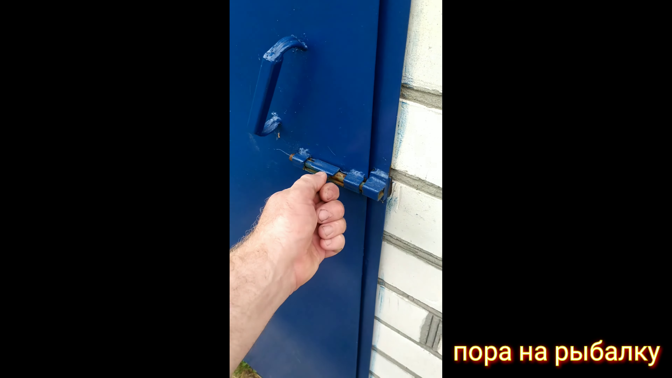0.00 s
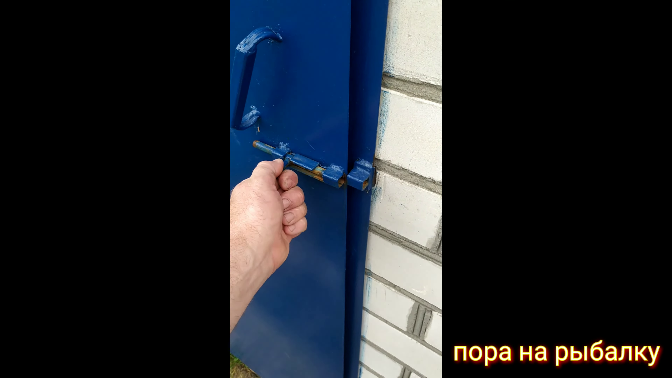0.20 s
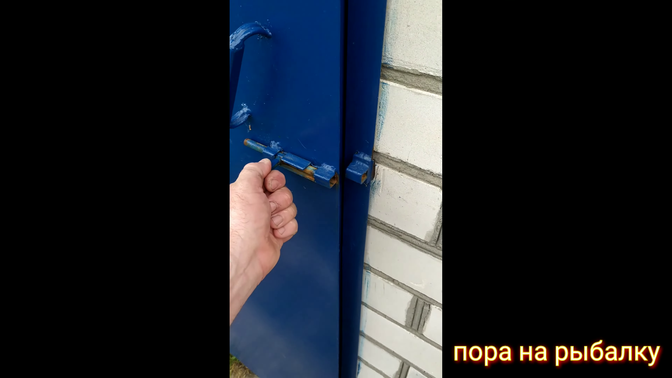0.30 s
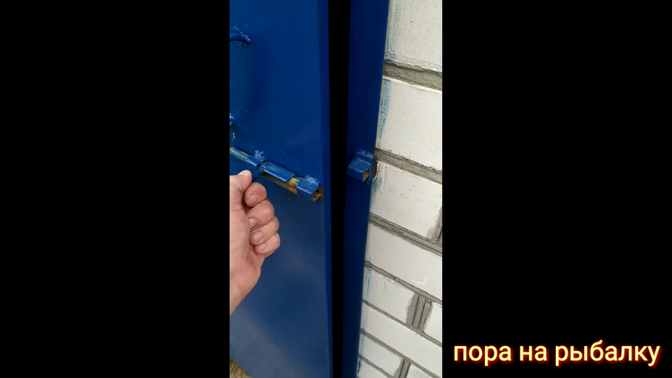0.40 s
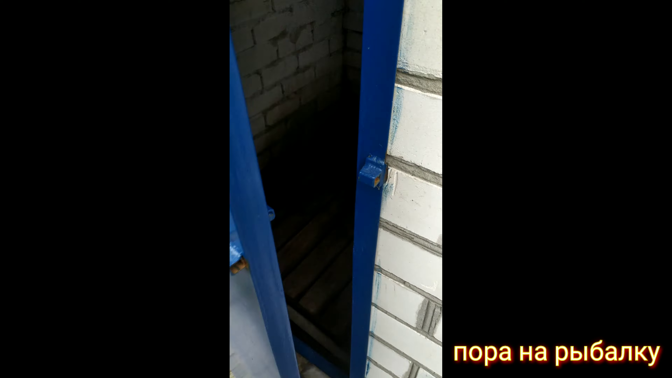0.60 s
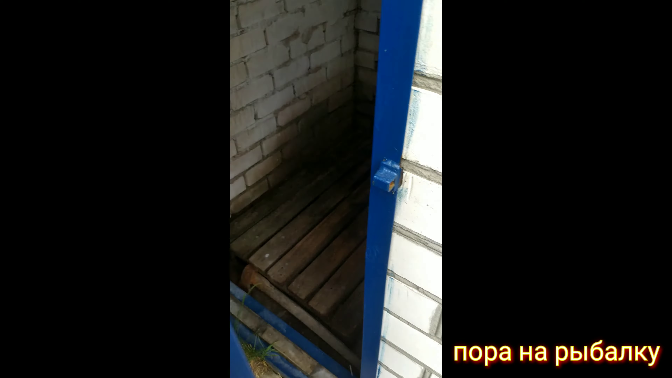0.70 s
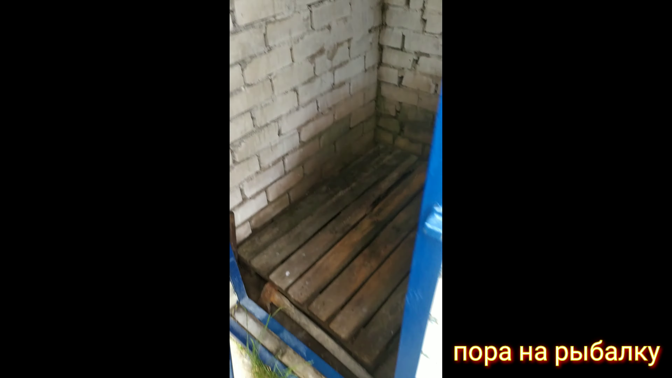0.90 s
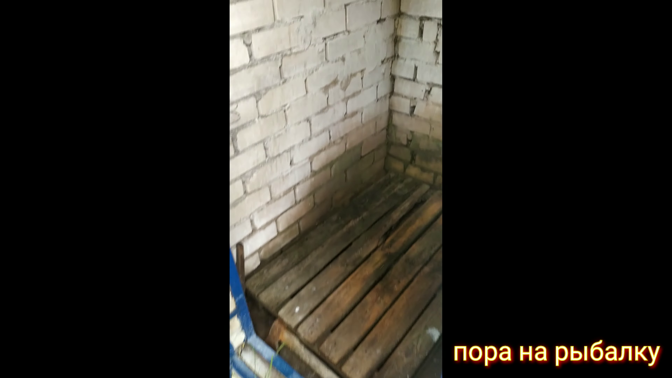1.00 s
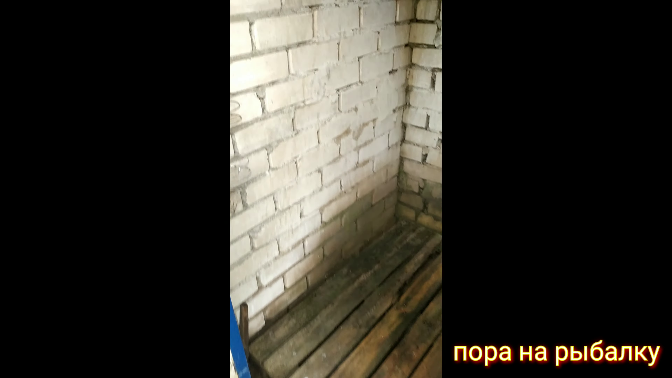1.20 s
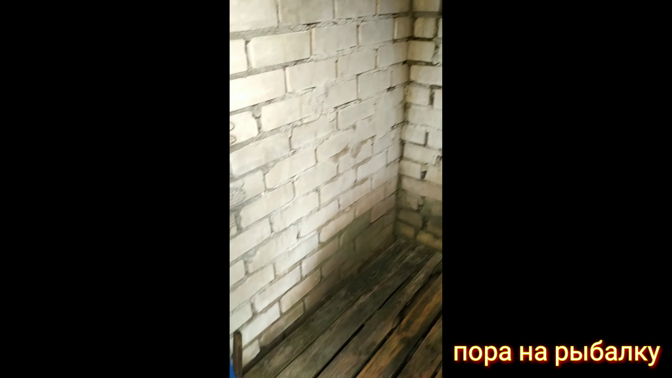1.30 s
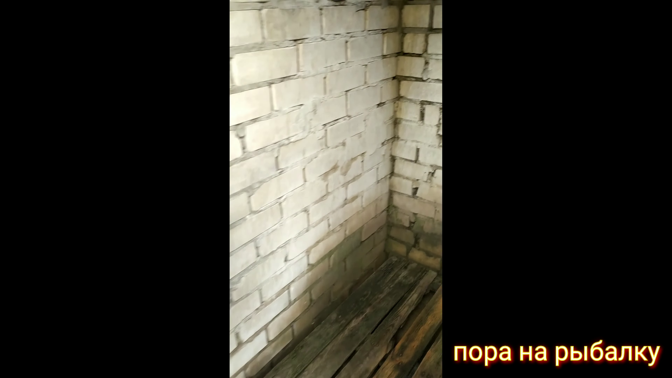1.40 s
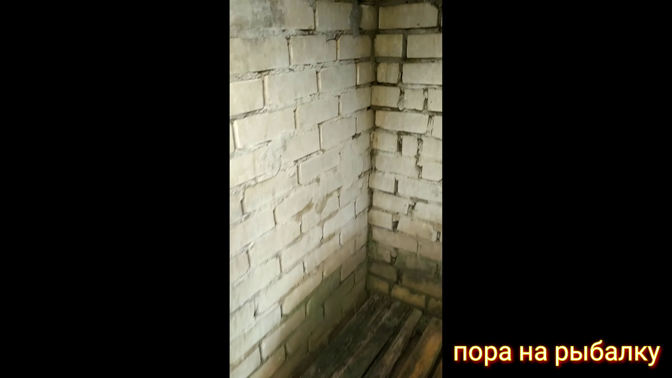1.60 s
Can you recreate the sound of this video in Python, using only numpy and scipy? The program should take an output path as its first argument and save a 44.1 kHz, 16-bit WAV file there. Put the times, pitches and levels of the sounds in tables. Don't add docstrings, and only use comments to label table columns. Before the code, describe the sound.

Metal bolt snaps back hard on a sheet-steel door, followed by lighter clinks and faint hiss

```python
import sys
import numpy as np
from scipy import signal
from scipy.fft import rfft, irfft
from scipy.io import wavfile
from scipy.ndimage import uniform_filter1d

SR = 44100
rng = np.random.default_rng(int(sys.argv[2]) if len(sys.argv) > 2 else 0)


def amp(db):
    return 10 ** (np.asarray(db, float) / 20)


def write(x):
    x = np.atleast_2d(x).T
    wavfile.write(sys.argv[1], SR, np.round(np.clip(x, -1, 1) * 32767).astype(np.int16))


N = 74970

# start in seconds, level in dB, chatter length in seconds,
# tilt in dB per octave, left-right difference in dB.
BOLT_HITS = [
    (.107, -39, 0.0092, -3.5, 1.5),
    (.2048, -19.5, 0.002, 0.5, .4),
    (.2066, -11, 0.0026, 1.5, 0.5),
    (.2125, -11.5, 0.013, 0.77, 2.7),
    (.226, -20, 0.04, -1.5, 1),
    (.252, -35, 0.04, 3, 4),
    (.3288, -22.5, 0.0031, 2, 3),
    (.3342, -24, 0.0043, 0.5, 1.5),
    (.487, -54, 0.0041, 3, 2),
]
# frequency in Hz, density in dB per Hz.
BOLT_COLOUR = [(120, -22), (200, -14.5), (386, -8.5), (829, -9.5), (2090, -5.5), (4410, -9), (8070, -1.5),
               (13000, -20), (14000, -15.5)]
# frequency in Hz, 60 dB decay time in seconds.
BOLT_T60 = [(250, 0.78), (1000, 0.2), (3000, 0.17), (8000, 0.068), (13000, 0.068)]
# frequency in Hz, level in dB, 60 dB decay time in seconds.
BOLT_MODES = [(7910, -15, 0.16), (7970, 5, 0.071), (8200, -29, 0.16), (8650, 2, 0.082), (9000, 3, 0.031)]


def bolt():
    return steel(BOLT_HITS, BOLT_COLOUR, BOLT_T60, BOLT_MODES, ring_db=6)


# start in seconds, level in dB, length in seconds,
# tilt in dB per octave, left-right difference in dB.
SCRAPES = [
    (.114, -31, 0.023, -4, 2),
    (.186, -27.5, 0.027, -1.5, 1.5),
    (1.092, -37.5, 0.058, -4.5, 2),
    (.11, -40, 0.041, 0.5, -1),
]
# frequency in Hz, 60 dB decay time in seconds.
SCRAPE_T60 = [(300, 0.92), (2000, 0.031), (10000, 0.11)]


def scrapes():
    return steel(SCRAPES, BOLT_COLOUR, SCRAPE_T60, count=400, swell=True)


# start in seconds, level in dB, chatter length in seconds,
# tilt in dB per octave, left-right difference in dB.
LOOSE_HITS = [(0, -48.5, 0.00064, -9, -1), (.6722, -51, 0.01, -4.5, 2.5), (.878, -57.5, 0.051, 10, 9),
              (.9188, -30.5, 0.0068, 1.5, 2.5), (.985, -39, 0.026, -5, -2.5), (1.0016, -27, 0.012, 8, 1),
              (1.0212, -30, 0.0026, 9, -5), (1.0245, -25.5, 0.0053, 0.3, -2),
              (1.0272, -26, 0.0058, -0.4, 3), (1.266, -47, 0.031, 2.5, 5.5), (1.096, -33.5, 0.043, -4, 1.6),
              (1.2, -53, 0.01, 1, 1), (1.697, -46.5, 0.0036, -9.5, 5)]
# frequency in Hz, density in dB per Hz.
LOOSE_COLOUR = [(350, -21), (600, -12), (1640, -1.5), (2850, -4), (4080, 1), (10500, -15), (13600, -97),
                (22000, -120)]
# frequency in Hz, 60 dB decay time in seconds.
LOOSE_T60 = [(500, 0.45), (2000, 0.27), (6000, 0.14), (12000, 0.206)]


def loose_parts():
    return steel(LOOSE_HITS, LOOSE_COLOUR, LOOSE_T60)


# start in seconds, level in dB, chatter length in seconds,
# tilt in dB per octave, left-right difference in dB.
DRY_HITS = [
    (1.2641, -32, 0.0007, 1.5, 7),
    (1.0212, -29, .0008, 11, 10),
    (1.0016, -30, .0008, 5, 8),
]
# frequency in Hz, density in dB per Hz.
DRY_COLOUR = [(200, 2), (900, -21), (1800, -7.5), (5000, 1), (10000, -29)]
# frequency in Hz, 60 dB decay time in seconds.
DRY_T60 = [(200, 0.1), (2000, 0.057), (10000, 0.025)]


def dry_taps():
    return steel(DRY_HITS, DRY_COLOUR, DRY_T60, count=400)


# start in seconds, frequency in Hz, rise in seconds, 60 dB decay time in seconds.
PINGS = [(1.121, 11800, .03, .085), (1.002, 12200, .003, .3), (.9195, 1930, .002, .07),
         (1.022, 1630, .003, .2), (1.285, 1385, .012, .1), (.12, 710, .006, .11), (1.676, 105, .008, .07),
         (.2, 135, .03, .4), (.21, 390, .02, .4), (.3, 375, .015, .22), (1.572, 65, .01, .15),
         (1.04, 330, .02, .3), (1.155, 7300, .005, .15), (1.264, 210, .002, .07), (.13, 200, .02, .25),
         (1.09, 975, .015, .3), (.6715, 2000, .001, .17), (.672, 4000, .001, .12), (.676, 2900, .005, .15),
         (.68, 2500, .006, .15), (.206, 9250, .002, .06), (.2122, 7150, .002, .07), (.214, 8050, .004, .13),
         (.19, 7000, .008, .05), (.3288, 9150, .004, .035), (.334, 7000, .001, .05),
         (.331, 2010, .004, .25), (.34, 5050, .006, .1), (1.0025, 8050, .006, .05),
         (1.002, 4200, .003, .08), (1.025, 4250, .002, .1), (1.025, 6200, .002, .06),
         (.985, 2000, .005, .06), (1.097, 1610, .01, .25), (1.1, 1250, .02, .2), (.92, 6900, .002, .1),
         (1.2645, 330, .001, .05), (1.2642, 2000, .001, .04), (1.266, 4900, .003, .12),
         (.205, 560, .008, .2), (1.02, 200, .008, .15), (1.095, 170, .01, .12), (.19, 215, .01, .2),
         (.11, 2050, .015, .3), (.92, 4200, .002, .12), (1.208, 2550, .006, .12)]
PING_DB = [-13, -39, -31, -36, -44.5, -36, -38.5, -37.5, -38, -41, -49, -58.5, -51, -48, -41.5, -44.5, -47,
           -60, -58.5, -55, -15, -15.5, -21, -40.5, -13.5, -23.5, -42, -36, -23.5, -26, -34, -26, -40, -52,
           -49, -30, -51.5, -42, -46, -41, -52.5, -49.5, -43.5, -39.5, -41.5, -44]
PING_PAN_DB = [-4.5, -1, -3, .3, 12, 0.7, -16, -1.5, 1, 2, -17.5, 6, 12, 0, -0.7, -8, 1, -1, 5.5, 5.5, 1.5,
               1.5, -2, -1.5, -5, 5.5, 7.5, 9, 19.5, 9, 12, 9, -9, -4, -3, 4.5, 5, -7.5, 4, .3, -2, -2, .4,
               -1.5, 3, 0]


def pings():
    out, t = np.zeros((2, N)), np.arange(SR // 3) / SR
    for (s, hz, rise, t60), db, pan_db in zip(PINGS, PING_DB, PING_PAN_DB):
        u = rng.random((3, 7, 1, 1))
        spread = .06 if 600 < hz < 7000 else .022
        lag = min(hz / 2000, 1) * np.array([[2.8], [0]]) * u[0] ** (2000 / max(hz, 4000))
        phase = lag + min(hz / 300, 6) * u[2]
        knot = .75 * np.sin(2 * np.pi * hz * (1 + spread * (2 * u[1] - 1)) * t + phase).sum(0)
        envelope = (1 - np.exp(-t / rise)) * decay(t, t60)
        add(out, panned(db, pan_db) * envelope * knot, s)
    return out


def steel(hits, colour, t60, named=(), ring_db=0., count=600, swell=False):
    place = (np.arange(count) + rng.random(count)) / count
    hz = colour[0][0] + (colour[-1][0] - colour[0][0]) * place ** 2
    life = logcurve(t60, hz) * amp(1.1 * rng.standard_normal(count))
    db = logcurve(colour, hz) + 5 * np.log10(hz / 1000) - 10 * np.log10(life)
    if len(named):
        named_hz, named_db, named_t60 = np.array(named).T
        hz = np.r_[hz, named_hz]
        db = np.r_[db, db.max() + ring_db + np.minimum(named_db, 0) / 2]
        life = np.r_[life, np.minimum(named_t60, .11)]
    rings = rings_of(2j * np.pi * hz - np.log(1000) / life)
    t, out = np.arange(rings.shape[1]) / SR, np.zeros((2, N))

    z = rng.standard_normal((len(hits), 4, len(hz)))
    tilted = amp(db + np.array(hits)[:, 3:4] * np.log2(hz / 3000))
    gains = pair(hz, z[:, 0] + 1j * z[:, 1], z[:, 2] + 1j * z[:, 3]) * tilted
    gains = gains.reshape(-1, len(hz)).astype(np.complex64)
    crack = 1 + amp(3) * np.exp(-t / .001)
    struck = (gains @ rings).imag.reshape(2, len(hits), -1) * crack

    for (s, level_db, length, _, pan_db), ring in zip(hits, struck.swapaxes(0, 1)):
        x = signal.fftconvolve(ring, chatter(length, swell)[None], axes=1)
        x = x / np.sqrt(uniform_filter1d(x.mean(0) ** 2, 220).max())
        add(out, x * panned(level_db, pan_db), max(s, 0))
    return out


def chatter(length, swell):
    clicks_per_s, spread_db = 2000, 3
    u = rng.random((3, 4096))
    at = np.arange(4096) / SR / max(length, .001)
    if swell:
        envelope = np.sin(np.pi * np.minimum(at, 1))
    else:
        envelope = np.sqrt(np.maximum(1 - at, 0))
    sizes = amp(-spread_db * np.log(u[2] + 1e-3))
    clicks = (u[0] < clicks_per_s / SR) * np.sign(u[1] - .5) * sizes * envelope
    clicks[0] = 0 if swell else 1.44
    return clicks


def rings_of(pole, size=128):
    step = np.arange(size) / SR
    fine, coarse = (np.exp(np.outer(pole, step * k)).astype(np.complex64) for k in (1, size))
    return (coarse[:, :, None] * fine[:, None, :]).reshape(len(pole), -1)


# time in seconds, level in dB.
BOOM_DB = [(0, -37), (.08, -45.5), (.22, -41), (.55, -48), (.62, -57), (1.7, -58.5)]
# frequency in Hz, density in dB per Hz.
RUMBLE = [(100, 7), (170, 1), (366, -0.5), (501, -7), (900, -39), (1170, -80), (1980, -120)]
# time in seconds, level in dB.
RUMBLE_DB = [(0.0, -46), (1.002, -62), (1.7, -60.5)]


def door(t):
    boom_hz, width_hz = 128.3, 34
    b, a = signal.iirpeak(boom_hz, boom_hz / width_hz, fs=SR)
    boom = signal.lfilter(b, a, signal.lfilter(b, a, white()))
    boom = unit(boom) * amp(curve(BOOM_DB, t))
    return boom + coloured(RUMBLE, 4.5, 7.9, white) * amp(curve(RUMBLE_DB, t))


# frequency in Hz, density in dB per Hz.
HISS = [(2060, -6.5), (3500, -10), (4590, -8), (7900, -3.5), (9170, -2.5), (15300, -10)]
# time in seconds, level in dB.
HISS_DB = [(0, -63), (.5, -62.5), (.8, -61.5), (.9, -54.5), (1.2, -54), (1.33, -51.5), (1.42, -58),
           (1.5, -53), (1.7, -53)]


def water(t):
    return coloured(HISS, 3.2, 13.27, drops) * amp(curve(HISS_DB, t))


def drops():
    drops_per_s, spread_db = 7100, 1.5
    falls = rng.random(N) < drops_per_s / SR
    return white() * (0.19 + falls * amp(spread_db * rng.exponential(size=N)))


# frequency in Hz, density in dB per Hz.
HANDLING = [(12, -55), (20, -49), (54, 2.5), (92, -5), (200, -26), (260, -8.5), (440, -120)]
# time in seconds, level in dB.
HANDLING_DB = [(0, -47.5), (.42, -51.5), (.52, -56), (.78, -52.5), (.92, -55), (1.1, -51.5), (1.19, -50),
               (1.28, -52), (1.5, -57), (1.58, -55), (1.7, -63)]


def handling(t):
    common = coloured(HANDLING, 2.1, 28.0, white)
    difference = coloured(HANDLING, 2.1, 28.0, white)
    both = common + .55 * np.array([[-1], [1]]) * difference
    return both * panned(curve(HANDLING_DB, t), -0.5)


# frequency in Hz, density in dB per Hz.
YARD = [(240, 2.5), (400, -13.5), (433, -4.5), (575, -9), (689, -5), (6000, -24), (7800, -52),
        (13200, -120)]


def yard():
    return coloured(YARD, 2.5, 9, white) * amp(-62.5)


def room(x):
    level_db, t60 = -19, 0.28
    t = np.arange(int(.8 * SR)) / SR
    bright = rng.standard_normal((2, len(t))) * (t > .004)
    soft = signal.lfilter([.25], [1, -.75], bright)
    tail = soft * decay(t, t60) + 0.31 * bright * decay(t, 0.16 * t60)
    tail = tail / np.sqrt((tail ** 2).sum(1).mean())
    return signal.fftconvolve(x, amp(level_db) * tail, axes=1)[:, :N]


def coloured(table, flicker_db, rate, source):
    hz = np.maximum(np.arange(N // 2 + 1) * SR / N, 1.)
    low, high = table[0][0], table[-1][0]
    edge = 1 / (1 + (low / hz) ** 8) / (1 + (hz / high) ** 12)
    spec = pair(hz, rfft(source()), rfft(source())) * amp(logcurve(table, hz)) * edge
    place, out = 2 * np.log2(hz), 0
    for k in range(int(2 * np.log2(low)) - 1, int(2 * np.log2(high)) + 3):
        band = irfft(spec * np.clip(1 - abs(place - k), 0, 1), N)
        out = out + amp(flicker_db * walk(rate)) * band
    return out / np.sqrt(np.mean(out.mean(0) ** 2))


def pair(hz, a, b):
    alike_below_hz = 437
    share = 1 / (1 + (alike_below_hz / hz) ** 3)
    return np.array([a + share * b, a - share * b]) / np.sqrt(1 + share ** 2)


def walk(rate):
    k = int(SR / rate)
    held = np.repeat(rng.standard_normal(N // k + 1), k)
    return 0.47 * uniform_filter1d(uniform_filter1d(held, k), k)[:N]


def white():
    return rng.standard_normal(N)


def decay(t, t60):
    return np.exp(-np.log(1000) * t / t60)


def panned(db, pan_db):
    return amp(db + np.array([[.5], [-.5]]) * pan_db)


def unit(x):
    return x / np.sqrt(np.mean(x ** 2))


def curve(table, at):
    return np.interp(at, np.array(table)[:, 0], np.array(table)[:, 1])


def logcurve(table, hz):
    return np.interp(np.log(hz), np.log(np.array(table)[:, 0]), np.array(table)[:, 1])


def add(out, x, s):
    i = int(s * SR)
    out[:, i:i + x.shape[1]] += x[:, :N - i]


def scene():
    t = np.arange(N) / SR
    hits = bolt() + loose_parts() + dry_taps() + pings() + scrapes()
    thin = signal.butter(5, 13500, fs=SR, output="sos")
    hits = signal.sosfilt(thin, hits)
    return hits + room(hits) + door(t) + water(t) + handling(t) + yard()


def bandpass(x, low_hz, high_hz):
    return signal.sosfiltfilt(signal.butter(6, [low_hz, high_hz], "bandpass", fs=SR, output="sos"), x)


def power(x):
    return uniform_filter1d((x ** 2).mean(0), 1024) + 1e-14


def roll_off(x):
    return signal.sosfilt(signal.butter(12, 15450, fs=SR, output="sos"), x)


# low edge in Hz, high edge in Hz, level in dB relative to the whole sound below
STARVED = [(12600, 13900, -29), (13700, 15600, -31), (10200, 10850, -25), (10850, 11500, -26)]


def record(dry):
    x = np.clip(dry, -1, 1)
    x = signal.sosfiltfilt(signal.butter(10, 15800, fs=SR, output="sos"), x)
    whole = power(bandpass(x, 700, 15000))
    for low_hz, high_hz, under_db in STARVED:
        top = bandpass(x, low_hz, high_hz)
        x = x - top / (1 + (power(top) / whole / amp(2 * under_db)) ** 6)
    return roll_off(x)


dry = scene()
out = record(dry)
write(out)
```